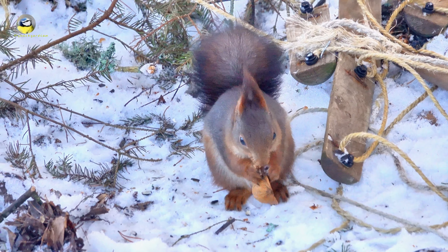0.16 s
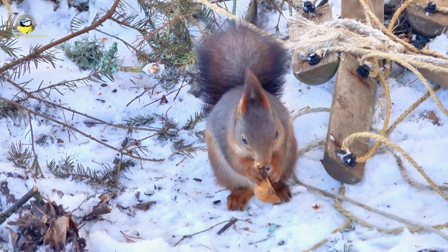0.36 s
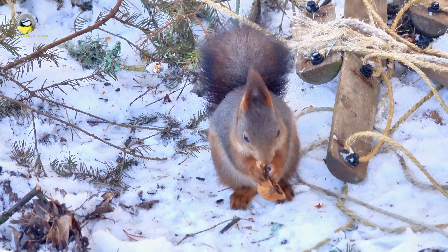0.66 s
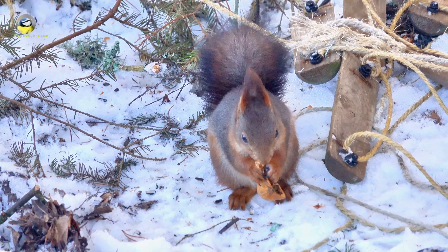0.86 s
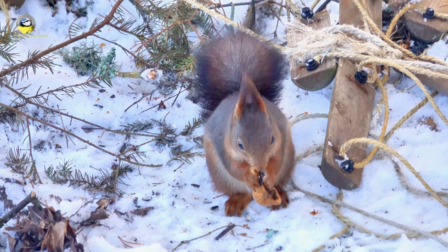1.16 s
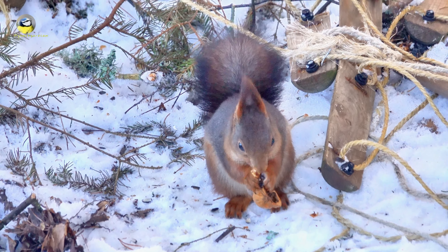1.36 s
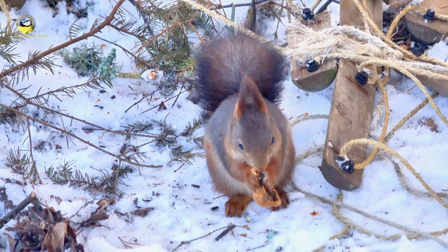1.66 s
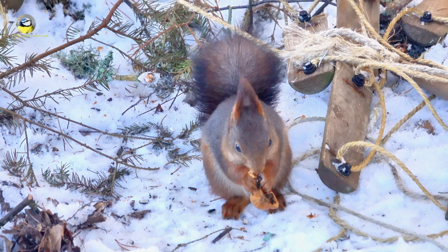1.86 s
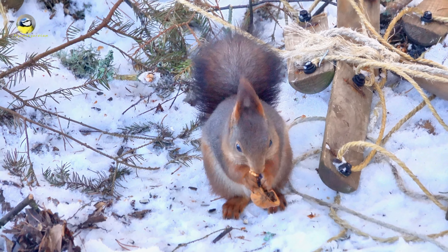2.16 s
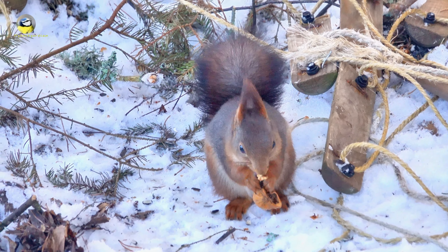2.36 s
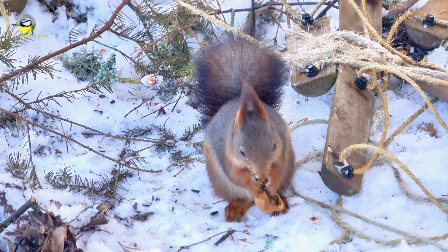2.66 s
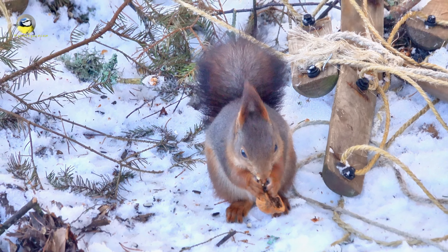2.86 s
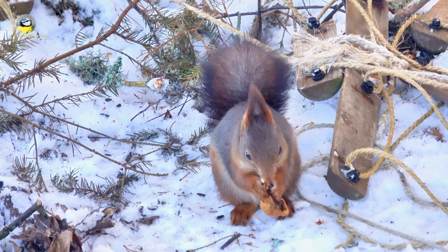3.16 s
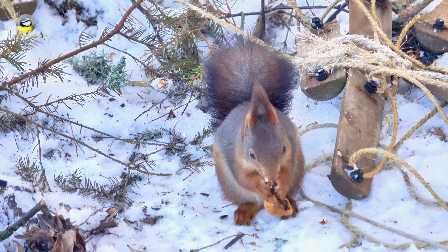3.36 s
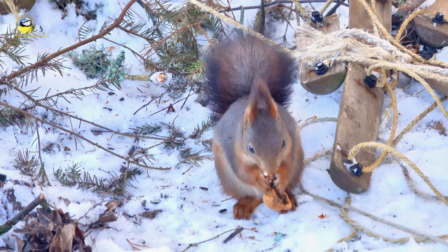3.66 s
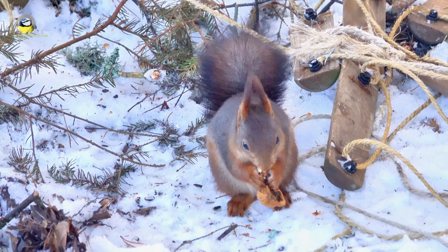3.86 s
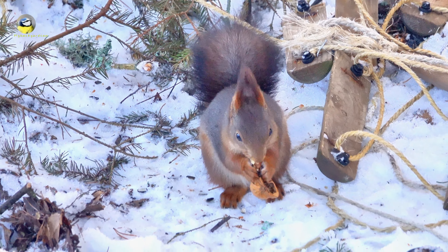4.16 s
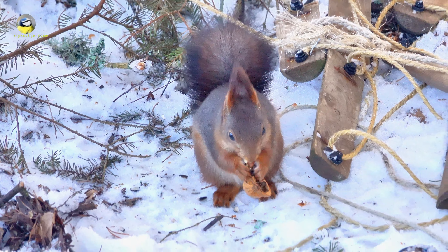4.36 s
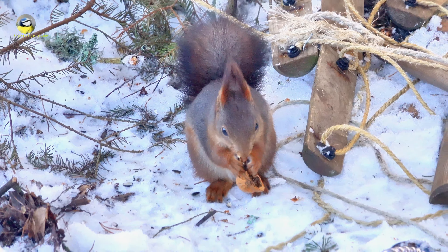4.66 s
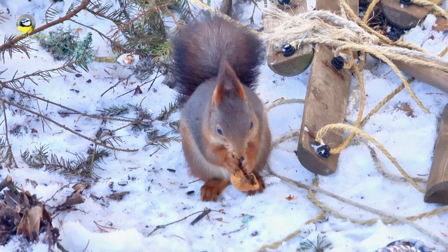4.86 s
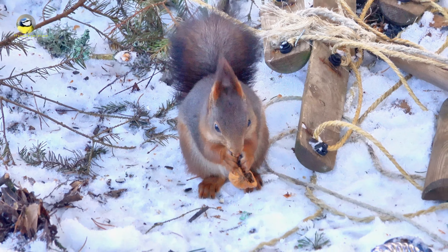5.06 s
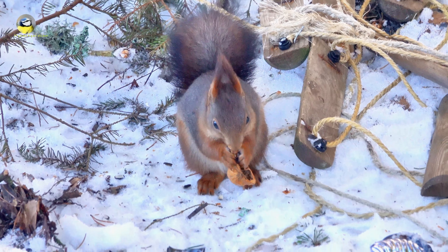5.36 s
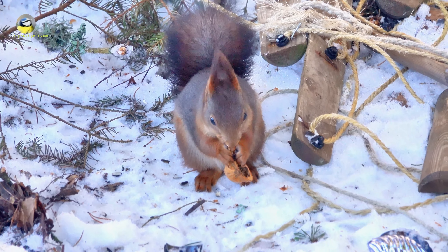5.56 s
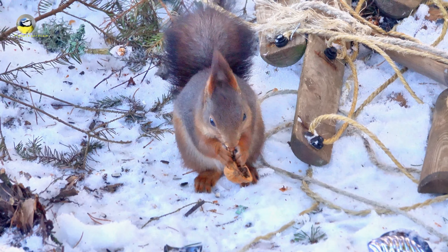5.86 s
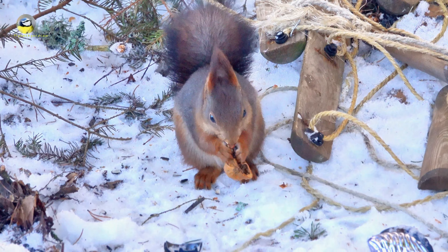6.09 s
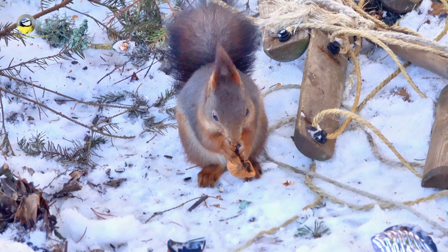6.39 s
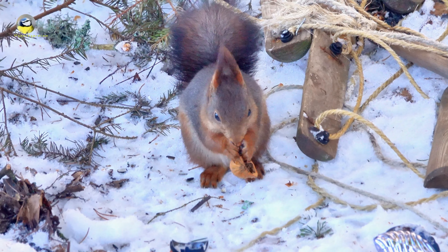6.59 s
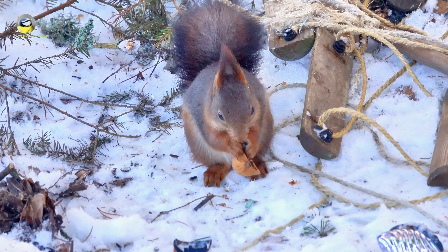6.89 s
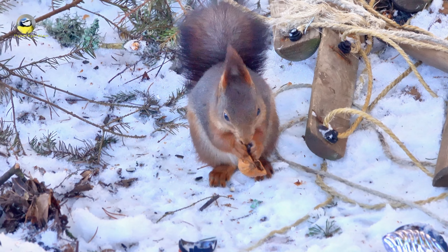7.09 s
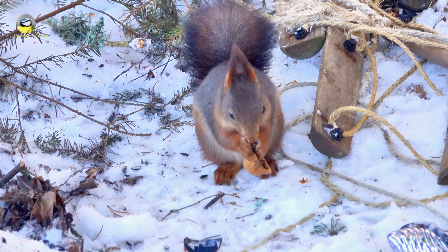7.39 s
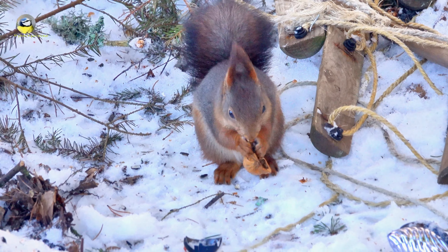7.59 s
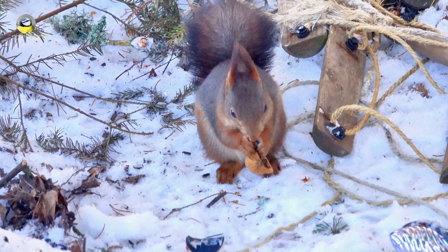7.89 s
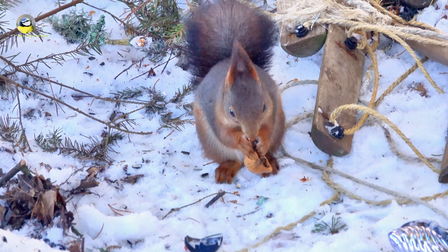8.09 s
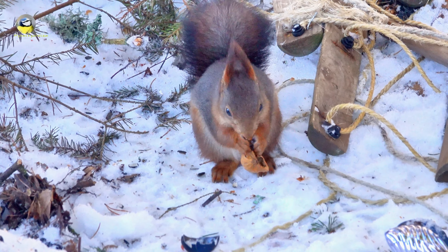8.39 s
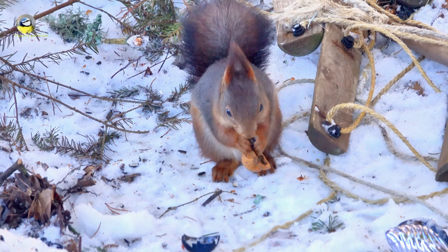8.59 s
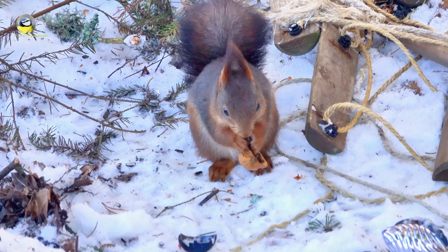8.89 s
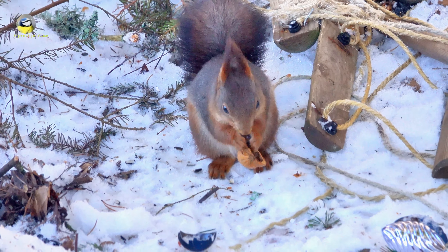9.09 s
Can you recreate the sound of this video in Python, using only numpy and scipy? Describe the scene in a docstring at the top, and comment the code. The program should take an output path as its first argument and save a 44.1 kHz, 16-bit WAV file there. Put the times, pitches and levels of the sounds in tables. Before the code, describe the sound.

A small bird sings clear, quick whistled phrases in the trees, falling slurs, short chips and warbles, each ringing on through the wood for about a second. Close to the microphone a squirrel makes a few very faint gritty scrapes on a nut, then one tiny sharp crack near the middle. A soft, steady far hush lies underneath.

```python
"""A small songbird sings long warbling phrases in a wood, each note one gliding whistle.
A noise-built echo pattern throws the notes back and lets the wood ring on for about a second.
Close by, a squirrel scrapes at its nut with short patches of grit and cracks it in a few fast snaps.
Shaped noise and a faint low hum make the soft far hush that lies under everything."""
import sys
import numpy as np
from scipy import signal
from scipy.fft import rfft, irfft
from scipy.io import wavfile
from scipy.ndimage import uniform_filter1d, map_coordinates

SR = 44100
rng = np.random.default_rng(int(sys.argv[2]) if len(sys.argv) > 2 else 0)


def put_to_file(sound):
    """Save the sound as 16-bit audio at rate SR, in the file named by the first command-line argument."""
    columns = np.atleast_2d(sound).T  # one column per channel
    safe = np.clip(columns, -1, 1)
    whole_steps = np.round(safe * 32767)
    wavfile.write(sys.argv[1], SR, whole_steps.astype(np.int16))


N = 407484  # length in samples


def undb(db):
    """Decibels to gain."""
    return 10 ** (np.asarray(db) / 20)


def unit(x):
    """Scale to rms 1."""
    return x / np.sqrt(np.mean(x ** 2))


def over_hz(points, size):
    """Read (f/Hz, value) points at the bins of a spectrum, straight lines over log frequency."""
    hz, value = np.transpose(points)
    bins_hz = np.fft.rfftfreq(size, 1 / SR)
    return np.interp(np.log(bins_hz + 1), np.log(hz), value)  # + 1 keeps the log finite at 0 Hz


def colour(x, gain):
    """Weight a sound's spectrum."""
    return irfft(rfft(x) * gain, len(x))


def walk(rate, size):
    """Smooth random curve through normal knots, rate knots a second."""
    knots = rng.standard_normal(int(size / SR * rate) + 3)
    return map_coordinates(knots, [np.arange(size) * rate / SR], order=2, mode="nearest")


def add(track, s, sound):
    """Mix a sound into a track at s seconds."""
    i = max(int(s * SR), 0)
    track[i:i + len(sound)] += sound[:max(N - i, 0)]


def hush():
    """Far outdoor air: shaped noise, less alike left and right in the mid range, over a faint low hum."""
    # spectrum of the far air: (f/Hz, relative level/dB)
    air_spectrum = [(20,-34),(50,-24.5),(65,-21.5),(100,-25.5),(160,-32.5),(230,-27),(320,-18.5),(430,-19.5),(640,-11),(1000,-5),(1500,-0.5),(2700,-3.5),(5200,-9.5),(7700,-18),(9500,-21.5),(15500,-23.5)]
    # likeness of the air left and right: (f/Hz, correlation)
    air_likeness = [(60, .998), (180, .992), (350, .972), (700, .86), (1100, .77), (4000, .72), (7000, .8),
                    (10000, .99)]
    # steady hum tones: (f/Hz, level/dB)
    hum_tones = [(76, -100)]
    mid_db = -55  # rms of the part common to both sides
    gain = undb(over_hz(air_spectrum, N))
    likeness = over_hz(air_likeness, N)
    mid = colour(rng.standard_normal(N), gain)
    side_gain = gain * np.sqrt((1 - likeness) / (1 + likeness))
    side = colour(rng.standard_normal(N), side_gain)
    air = (mid + np.array([side, -side])) / np.std(mid) * undb(mid_db)
    t = np.arange(N) / SR
    hum = sum(undb(db) * np.sqrt(2) * np.sin(2 * np.pi * hz * t) for hz, db in hum_tones)
    return air + hum


# Each note is (t/s, pitch track f/Hz, direct level/dB, wood send level/dB).
# Direct goes straight to the listener; the send drives the echoes, ahead of their common trim.


def progress(length):
    """0 to 1 over a note of length seconds."""
    return np.linspace(0, 1, int(length * SR))


def slur(length, from_hz, to_hz):
    """Pitch of a falling note: a quick dive that flattens."""
    curve = 2.3  # 1 is a straight slide; more dives first and flattens later
    return to_hz + (from_hz - to_hz) * (1 - progress(length)) ** curve


def chips():
    """Short notes whose pitch rises and falls in one parabolic arch."""
    # chips: (t/s, length/s, top f/Hz, direct level/dB)
    chip_notes = [(.01, 0.016, 4250, -58.5), (0.087, .023, 4260, -61), (.398, 0.044, 4550, -52.5),
                  (1.747, 0.0157, 4730, -33), (1.923, 0.02, 4640, -36), (5.867, 0.0187, 5570, -40),
                  (7.983, 0.0244, 5890, -43), (7.88, .06, 5200, -57.5)]
    arch = 0.18  # share by which both ends lie under the top
    send_db = 1  # wood send relative to direct
    for s, length, top, db in chip_notes:
        bow = (2 * progress(length) - 1) ** 2
        yield s, top * (1 - arch * bow), db, db + send_db


def falls():
    """Falling slurs, which dive and then flatten."""
    # falls: (t/s, length/s, from f/Hz, to f/Hz, direct level/dB, wood send level/dB)
    fall_notes = [(0.373, 0.036, 7030, 5450, -61.5, -60), (1.795, 0.0064, 7900, 6600, -48, -39),
                  (1.829, 0.023, 6120, 4220, -38.5, -32), (1.926, 0.014, 8200, 5220, -44.5, -33),
                  (2.017, 0.013, 5000, 3500, -42.5, -32), (2.261, 0.035, 7060, 5570, -49.5, -43),
                  (2.345, 0.015, 8730, 4720, -48, -40), (2.401, 0.01, 7070, 5560, -48, -40.5),
                  (2.618, 0.043, 7330, 5480, -45, -36), (2.676, 0.045, 7630, 6050, -62, -41),
                  (2.743, 0.031, 8280, 7430, -53, -38.5), (2.812, 0.04, 8140, 6500, -65, -40),
                  (2.858, 0.023, 6500, 4700, -44, -34), (2.996, 0.016, 4160, 3220, -43.5, -26.5),
                  (3.101, .03, 3214, 2290, -44, -44.5), (3.217, 0.053, 4760, 3930, -46, -27.5),
                  (3.233, 0.083, 5030, 4400, -36.5, -40), (3.428, 0.021, 3500, 2800, -46, -33),
                  (4.008, 0.045, 8250, 6950, -40.5, -38.5), (4.051, 0.026, 8000, 6500, -39.5, -44),
                  (4.014, 0.089, 9230, 8460, -50.5, -52), (4.278, 0.041, 5110, 3790, -38.5, -29),
                  (4.867, 0.024, 7000, 6320, -47.5, -44), (6.406, 0.02, 5440, 4550, -42, -36),
                  (6.515, 0.027, 5500, 4680, -43.5, -44), (6.899, .052, 5630, 4600, -37, -37.5),
                  (6.952, 0.0066, 4900, 3300, -51, -38), (7.345, 0.0337, 4430, 3840, -54, -44),
                  (7.823, 0.032, 7370, 6790, -54, -38), (7.842, 0.007, 6400, 4700, -49, -34.5),
                  (7.999, 0.028, 5870, 3860, -39.5, -36.5), (8.074, .035, 7690, 6450, -52, -44),
                  (8.245, 0.011, 5190, 3260, -38.5, -28), (8.366, 0.051, 4380, 3970, -30.5, -26),
                  (8.476, .019, 4680, 3506, -38, -23), (8.575, 0.016, 4200, 2897, -45, -31),
                  (8.744, .029, 3470, 2950, -45, -34), (9.071, 0.038, 5300, 3850, -34.5, -28)]
    for s, length, start, end, *levels in fall_notes:
        yield s, slur(length, start, end), *levels


def whistles():
    """Held whistles that drift evenly through their centre pitch."""
    # whistles: (t/s, length/s, centre f/Hz, drift f/Hz, direct level/dB, wood send level/dB)
    whistle_notes = [(1.352, 0.034, 4000, -300, -60, -47), (2.079, 0.076, 4650, 214, -41, -36),
                     (2.091, 0.073, 3150, 242, -61, -44), (2.235, .062, 3974, 568, -38, -30.5),
                     (2.283, 0.059, 4325, 232, -38.5, -35), (2.478, 0.052, 4520, 0, -42, -41.5),
                     (2.931, 0.028, 6125, 176, -59, -37), (3.076, 0.054, 6070, 67, -40, -38),
                     (3.935, 0.05, 4500, -200, -35, -27.5), (3.985, 0.076, 4438, 0, -37.5, -35.5),
                     (4.385, 0.067, 4596, -140, -36.5, -32), (5.078, 0.071, 7340, -88, -59.5, -62),
                     (5.47, 0.052, 3915, -150, -58.5, -51), (5.799, 0.013, 5390, -230, -48.5, -40),
                     (6.445, .07, 5470, 354, -34, -35.5), (6.644, 0.039, 6260, 63, -44, -54),
                     (7.005, 0.054, 3650, 221, -53, -42.5), (7.681, 0.09, 7660, 505, -69, -55),
                     (7.77, 0.046, 4560, -250, -54, -49.5), (8.257, 0.04, 3143, -350, -41, -32),
                     (8.486, 0.0454, 5043, 88, -32.5, -29.5), (8.529, 0.059, 5130, -28, -34, -31),
                     (9.11, 0.025, 3770, -5, -35, -26)]
    for s, length, pitch, drift, *levels in whistle_notes:
        yield s, pitch + drift * (progress(length) - .5), *levels


def rises():
    """Rising slurs on a straight slide."""
    # rises: (t/s, length/s, from f/Hz, to f/Hz, direct level/dB, wood send level/dB)
    rise_notes = [(1.667, 0.01, 3290, 5110, -48, -37.5), (3.051, .031, 3086, 3646, -45, -30),
                  (3.199, 0.025, 4220, 5190, -36.5, -33), (5.885, 0.0044, 4400, 5100, -36.5, -31.5),
                  (5.893, 0.042, 5620, 7500, -50, -42.5), (6.051, 0.026, 4400, 5720, -40, -39),
                  (6.115, 0.0204, 4550, 5800, -39, -36), (6.436, 0.0155, 4200, 5250, -45, -44),
                  (6.513, 0.024, 6320, 6640, -43, -47), (7.113, 0.0082, 3750, 5400, -41.5, -45),
                  (7.126, 0.022, 3290, 5700, -47, -42), (8.298, 0.043, 6770, 7560, -56, -43.5),
                  (8.61, 0.035, 2216, 2460, -53, -40.5), (8.707, 0.029, 4340, 4650, -36, -37),
                  (8.772, 0.029, 2483, 3100, -49, -33), (9.021, 0.013, 2330, 4260, -44.5, -33)]
    for s, length, start, end, *levels in rise_notes:
        yield s, start + (end - start) * progress(length), *levels


def warbles():
    """The pitch swings about a sliding centre; the voice weakens on each upswing."""
    # warbles: (t/s, length/s, centre from f/Hz, centre to f/Hz, swings per s,
    #           direct level/dB, wood send level/dB)
    warble_notes = [(1.679, 0.026, 3500, 3570, 16.3, -49, -39), (3.023, .026, 2937, 2670, 28, -43.5, -37.5),
                    (3.311, 0.089, 3790, 3766, 30, -36.5, -29.5), (5.819, 0.04, 5430, 5570, 27, -43, -37.5),
                    (5.921, 0.12, 4906, 5070, 11.5, -39, -37.5), (6.36, .07, 6960, 5490, 50, -42, -33.5),
                    (6.516, .09, 6340, 5920, 110, -42.5, -34.5),
                    (7.872, 0.1, 7050, 7700, 22.3, -48.5, -37.5),
                    (9.163, 0.065, 4350, 3700, 31.4, -39.5, -33)]
    swing_hz, pulse_db = 415, 6.5  # reach of a swing either way; deepest loss on the upswing
    for s, length, start, end, rate, near_db, wood_db in warble_notes:
        u = progress(length)
        turn = 2 * np.pi * rate * length * u
        pitch = start + (end - start) * u + swing_hz * np.cos(turn)
        effort_db = pulse_db * np.minimum(np.sin(turn), 0)
        yield s, pitch, near_db + effort_db, wood_db + effort_db


def twitter():
    """Faint high slurs follow each other at a loose pace and scattered pitch."""
    # twitter between the loud notes: (from t/s, to t/s, typical f/Hz, wood send level/dB)
    twitter_runs = [(1.68, 2.02, 8220, -52), (1.791, 2.12, 7040, -63), (2.481, 2.66, 7900, -55),
                    (4.706, 4.86, 7200, -51.5), (4.81, 4.86, 8600, -48), (5.939, 6.04, 8370, -53.5),
                    (7.328, 7.37, 7660, -51.5), (8.019, 8.06, 8390, -43.5), (8.36, 8.41, 7350, -45.5)]
    gap_s, length_s = .055, 0.04
    scatter, fall = 0.045, 0.116  # shares of the pitch
    direct_db = -13  # direct relative to the wood send
    for first, last, pitch, db in twitter_runs:
        for s in np.arange(first, last, gap_s):
            late, high = rng.uniform(-0.8, 1, 2)
            hz = pitch * (1 + scatter * high)
            glide = slur(length_s, hz * (1 + fall / 2), hz * (1 - fall / 2))
            yield s + 0.26 * late * gap_s, glide, db + direct_db, db


def cascades():
    """Staircases of slurs, one for each equal step down in pitch, each louder than the one before."""
    # cascades: (t/s, steps, step length/s, top f/Hz, bottom f/Hz,
    #            last step's direct level/dB, last step's wood send level/dB)
    cascade_runs = [(2.149, 2, 0.015, 7930, 4820, -43.5, -39), (2.565, 2, 0.022, 7200, 4500, -41.5, -36.5),
                    (3.77, 3, 0.023, 6600, 3970, -39, -28), (5.667, 2, 0.014, 8050, 3800, -48, -42),
                    (6.842, 2, 0.024, 7770, 5910, -46.5, -42), (7.207, 2, .029, 5620, 4640, -35.5, -37),
                    (8.123, 2, .023, 6840, 5400, -38, -33.5), (9.006, 2, .03, 7260, 5050, -38.5, -30)]
    overlap = 0.308  # share of a step by which the next starts higher
    swell_db = 4.5  # gain from step to step
    sung = .88  # share of a step that sounds; the rest is a gap
    for s, steps, length, top, bottom, near_db, wood_db in cascade_runs:
        count = round(steps)
        drop = (top - bottom) / count
        for k in range(count):
            start = top - drop * (k - overlap * (k > 0))
            end = top - drop * (k + 1)
            softer_db = swell_db * (count - 1 - k)
            yield s + k * length, slur(sung * length, start, end), near_db - softer_db, wood_db - softer_db


def notes():
    """Every note of the song, kind by kind."""
    for kind in (chips, falls, whistles, rises, warbles, twitter, cascades):
        yield from kind()


def song(waver=0.0092, overtone_db=-31):
    """The syrinx whistles an almost pure tone; the turning head shares it between listener and wood."""
    edge_s, edge_share = 0.004, 0.31  # attack and release; most of a note that both edges may take
    flutter_db = 2  # spread of the quick level changes
    strain_db_per_octave, strain_from_hz = 4, 4770  # within a note, the voice thins above this pitch
    direct, spread = np.zeros((2, N))
    pitch_walk, effort_walk = walk(260, N), walk(140, N)
    for s, pitch, near_db, wood_db in notes():
        at = (int(s * SR) + np.arange(len(pitch))) % N
        hz = pitch * (1 + waver * pitch_walk[at])
        edges = min(2 * edge_s * SR / len(hz), edge_share)
        swell = signal.windows.tukey(len(hz), edges) * undb(flutter_db * effort_walk[at])
        octaves = np.log2(np.maximum(pitch, strain_from_hz))
        swell = swell * undb(-strain_db_per_octave * (octaves - octaves.mean()))
        phase = 2 * np.pi * np.cumsum(hz) / SR
        # only the high, pressed notes carry an overtone, fading in from 6 to 7 kHz
        pressed = np.clip((hz - 6000) / 1000, 0, 1)
        overtone = pressed * undb(overtone_db) * np.sin(2 * phase)
        note = np.sqrt(2) * swell * (np.sin(phase) + overtone)
        add(direct, s, undb(near_db) * note)
        add(spread, s, undb(wood_db) * note)
    return direct, spread


def trunks(slow_t60, fast_t60, grain_db):
    """Echo pattern of the wood: uneven returns early, an even tail later, the treble fading a bit faster."""
    t = np.arange(2 * SR) / SR
    # each 5-sample group has its own strength; the differences even out with time
    uneven_db = grain_db * np.repeat(rng.standard_normal(len(t) // 5), 5)
    grain = undb(uneven_db * np.exp(-t / .4))
    local_level = np.sqrt(uniform_filter1d(grain ** 2, size=1500))
    returns = rng.standard_normal(len(t)) * grain / local_level
    build_up = np.sqrt(1 - np.exp(-t / .003))
    # share of the faster fade: (f/Hz, share)
    fast_share = over_hz([(3500, 0.73), (8500, 0.76)], len(t))
    out = 0
    for share, t60 in ((1 - fast_share, slow_t60), (fast_share, fast_t60)):
        fade = np.exp(-np.log(1000) * t / t60) * build_up  # 60 dB down after t60 seconds
        out = out + colour(returns * fade / np.sqrt(np.sum(fade ** 2)), share)
    return out


def bird(wood_db=-4.5):
    """The song and its echoes, which reach left and right partly alike; the whole leans from side to side."""
    # where the song leans: (t/s, left minus right level/dB)
    lean_points = [(0, 3), (1.8, 0), (2.3, -1), (3.2, -0.5), (4.4, -1), (5.7, 2.5), (6.5, 2), (7.2, 1),
                   (7.902, -0.5), (8.6, -1), (9.201, -1)]
    slow_t60, fast_t60 = 1.4, 1.15  # s
    width = undb(-6.5)  # side echoes relative to mid
    direct, spread = song()
    mid = signal.fftconvolve(spread, trunks(slow_t60, fast_t60, grain_db=6.0))[:N]
    side = signal.fftconvolve(spread, trunks(slow_t60, fast_t60, grain_db=6.0))[:N]
    echoes = (mid + width * np.array([side, -side])) / np.hypot(1, width)
    lean_db = np.interp(np.arange(N) / SR, *np.transpose(lean_points))
    balance = undb(np.array([lean_db, -lean_db]) / 2)
    return (direct + undb(wood_db) * echoes) * balance


def scrapes(grit_db=5):
    """Teeth and claws scrape the shell: short patches of fine, uneven grit."""
    # faint scrapes on the shell: (t/s, length/s, level/dB before the swell and fade)
    scrape_times = [(2.91, .02, -55), (3.01, .17, -55), (3.41, .12, -62), (3.765, .012, -55),
                    (3.928, .012, -55)]
    # colour of a scrape: (f/Hz, relative level/dB)
    scrape_spectrum = [(800, -15), (2500, -3), (7500, 6), (9000, 3), (11000, -18), (15000, -19)]
    out = np.zeros(N)
    for s, length, db in scrape_times:
        n = int(length * SR)
        grains = rng.standard_normal(n) * undb(grit_db * rng.standard_normal(n))
        grit = unit(colour(grains, undb(over_hz(scrape_spectrum, n))))
        add(out, s, undb(db) * np.hanning(n) * grit)
    return out


def nut():
    """A split runs through the shell as a few gritty snaps, each an exponentially dying noise burst."""
    # quick snaps of the splitting shell: (t/s, starting level/dB, decay/s)
    shell_snaps = [(4.5657, -45, 0.0037), (4.566, -50, 0.0048), (4.57, -50, 0.0022), (4.574, -43, 0.0054),
                   (4.578, -48, 0.013)]
    # colour of the shell: (f/Hz, relative level/dB)
    shell_spectrum = [(300, -35), (1200, -20), (2400, 12), (3300, -17), (5500, 9), (8000, -2), (12000, -8),
                      (15000, -26)]
    out = np.zeros(N)
    t = np.arange(SR // 20) / SR
    for s, db, decay in shell_snaps:
        grit = unit(colour(rng.standard_normal(len(t)), undb(over_hz(shell_spectrum, len(t)))))
        add(out, s, undb(db) * grit * np.exp(-t / decay))
    return out


def scene():
    """Far hush, bird in the trees, squirrel at its nut."""
    return hush() + bird() + scrapes() + nut()


def record(dry):
    """The recorder cuts the top: a steep elliptic low-pass."""
    top_hz = 15750
    low_pass = signal.ellip(10, .1, 70, top_hz, fs=SR, output="sos")  # 0.1 dB ripple, 70 dB stop
    return signal.sosfilt(low_pass, dry)


dry = scene()
out = record(dry)
put_to_file(out)
```